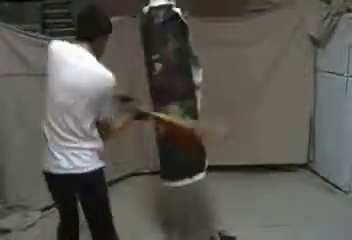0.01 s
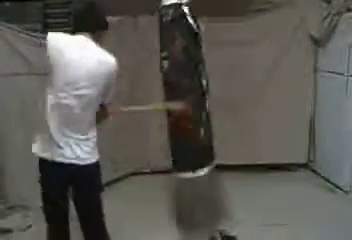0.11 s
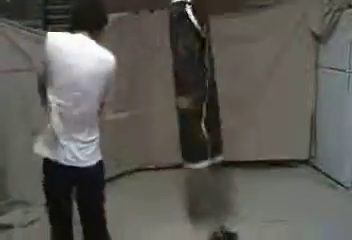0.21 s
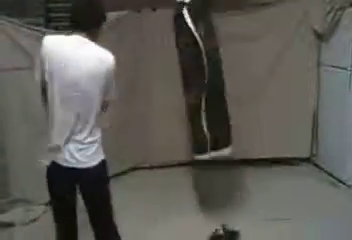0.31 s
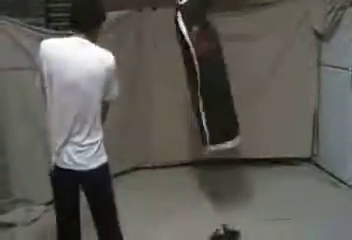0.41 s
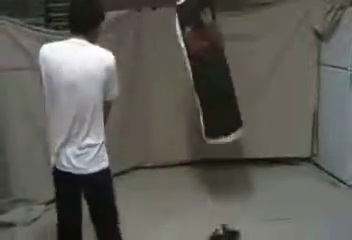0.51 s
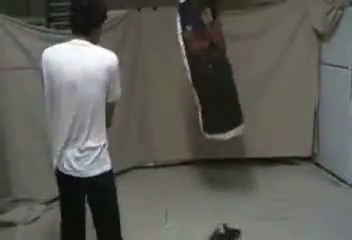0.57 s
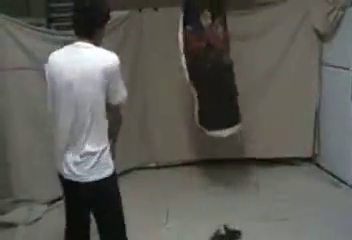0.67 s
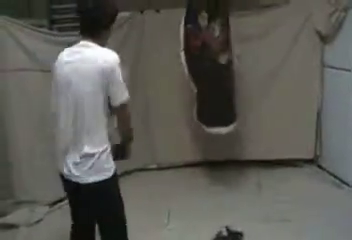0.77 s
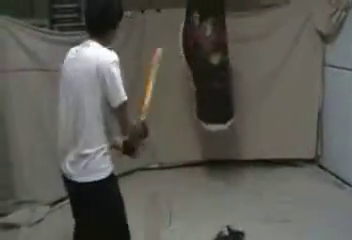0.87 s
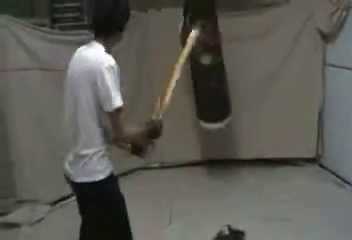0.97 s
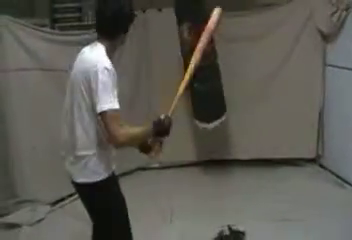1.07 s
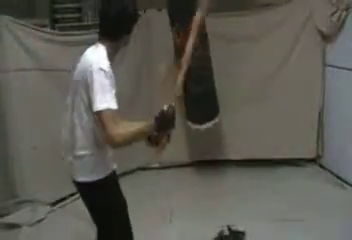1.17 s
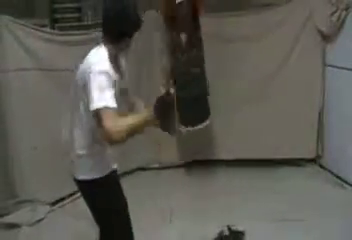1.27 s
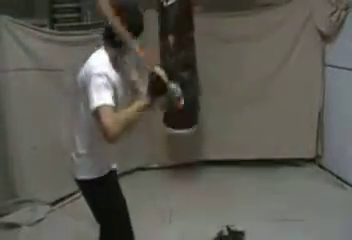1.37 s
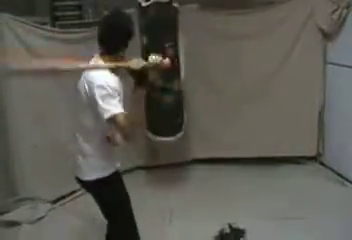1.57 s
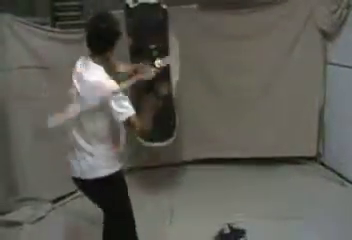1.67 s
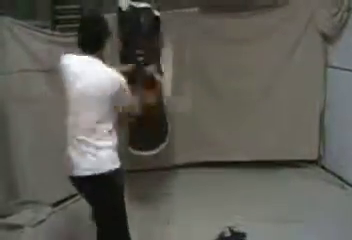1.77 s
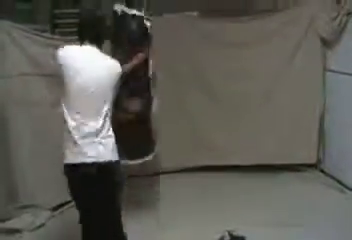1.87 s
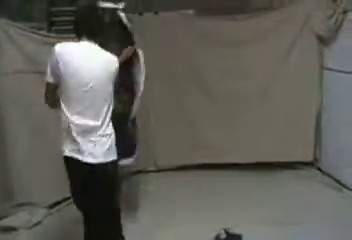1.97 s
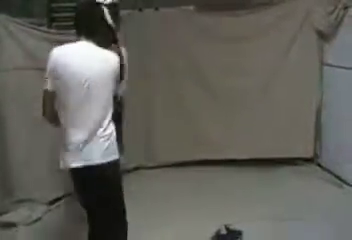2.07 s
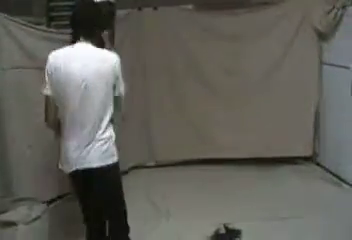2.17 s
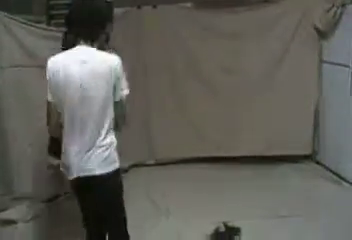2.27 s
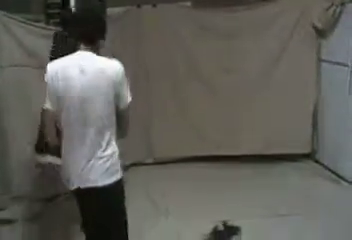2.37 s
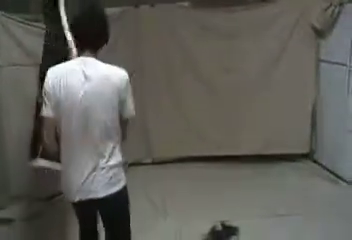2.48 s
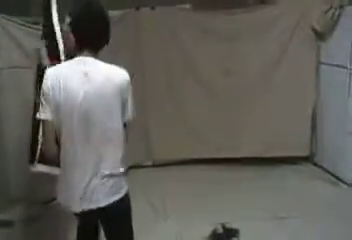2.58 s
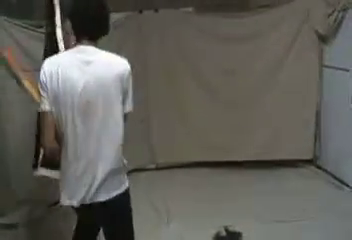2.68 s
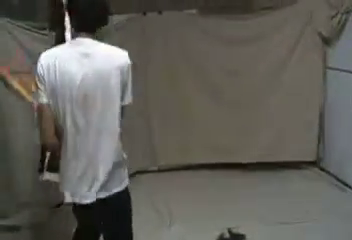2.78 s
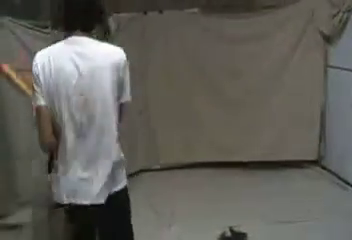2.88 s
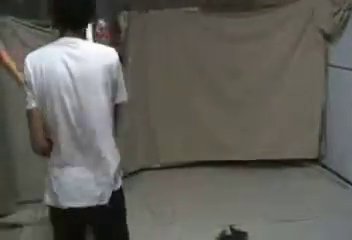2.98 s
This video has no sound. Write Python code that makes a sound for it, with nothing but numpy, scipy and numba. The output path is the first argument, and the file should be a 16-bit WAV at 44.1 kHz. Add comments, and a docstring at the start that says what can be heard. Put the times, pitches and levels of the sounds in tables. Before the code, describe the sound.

A wooden bat whacks a heavy bag twice in a booming, humming room.

```python
"""In a bare, booming room with a steady low hum, a wooden bat whacks a hanging heavy bag twice.
Each blow is a slap on the cover and a thud of the filling, and the room rings after it.
Around the swings, clothes tick and swish, shoes scuff and the bag's hanger rubs faintly.
Each blow overloads the microphone for a moment; a limiter turns the sound down and slowly back up."""
import sys
import numpy as np
from scipy import signal
from scipy.fft import rfft, irfft
from scipy.io import wavfile
from numba import njit

SR = 44100
rng = np.random.default_rng(int(sys.argv[2]) if len(sys.argv) > 2 else 0)


def master(y):
    """Save y as 16-bit WAV."""
    cut = np.clip(np.atleast_2d(y).T, -1, 1)
    pcm = np.round(cut * 32767)  # scale
    wavfile.write(sys.argv[1], SR, pcm.astype(np.int16))


N = 132300
TIME = np.arange(N) / SR
FREQS = np.maximum(np.arange(N // 2 + 1) * SR / N, 1)

# How much left and right differ. Each row: frequency in Hz, their difference against their sum in dB.
STEREO_WIDTH = [(60, -22.5), (190, -23), (340, -13.5), (590, -12.5), (1060, -10.5), (1900, -7), (3300, -4),
                (5900, 1), (10500, -2.5)]
# A motor's hum. Each row: pitch in Hz, level in dB.
MOTOR_TONES = [(56.8, -43), (113.9, -35), (227.5, -56.5), (392, -58), (600, -63.5)]
# The room's rumble and hiss. Each row: frequency in Hz, level in dB per octave.
RUMBLE_COLOUR = [(20, -19), (35, -58.5), (60, -39), (100, -43.5), (170, -49.5), (350, -52), (700, -56),
                 (1500, -53.5), (3000, -56), (6000, -60), (10500, -59)]
# The hanger's rubbing tones. Each row: pitch in Hz, width in Hz, level in dB.
HANGER_TONES = [(1250, 62, -49), (1410, 64, -51), (1590, 96, -44)]
# Faint ticks of clothing. Each row: start in seconds, level in dB, pitch in Hz.
CLOTH_TICKS = [(0.101, -40, 4000), (0.1779, -31, 1610)]
# Scuffs of shoes and cloth. Each row: peak time, rise and fall in seconds, level in dB,
# extra brightness in dB per octave.
SCUFF_EVENTS = [(.145, 0.019, 0.11, -48.5, 3), (1.006, 0.023, 0.073, -44.5, -1),
                (1.9, 0.034, 0.23, -53.5, 0), (1.947, .01, 0.014, -50, 6), (2.659, 0.01, 0.019, -35, 0),
                (2.67, 0.045, 0.09, -42, -1.5)]
# The tone of a scuff. Each row: frequency in Hz, level in dB per octave.
SCUFF_COLOUR = [(150, -14), (450, -5), (800, -5.5), (1500, -1), (2600, 0), (4800, 1), (7000, -3.5),
                (10500, -2)]
# Swishes of bat and body. Each row: peak time, rise and fall in seconds, level in dB.
SWISH_EVENTS = [(0.207, 0.015, 0.05, -43), (2.04, 0.028, 0.011, -48), (2.63, 0.12, .045, -39.5)]
# The dull tone of a swish. Each row: frequency in Hz, level in dB per octave.
SWISH_COLOUR = [(100, -23.5), (250, -6), (450, 3), (800, 1.5), (1400, -0.5), (2500, -6), (5000, -17.5),
                (10000, -34)]
# The room's ringing. Each row: frequency in Hz, level in dB per octave, seconds to build up,
# seconds to fade by 60 dB.
ROOM_BANDS = [(29, -11, 0.21, 1.39), (66.5, 3.5, 0.075, 1.024), (132, -2, 0.012, 0.55),
              (250, -7, 0.006, 0.61), (560, -13.5, 0.0068, 0.71), (1250, -11, 0.011, 0.73),
              (2510, -9, 0.025, 0.84), (4420, -14.5, 0.01, 0.85), (6130, -19, 0.0047, 0.84),
              (10800, -18, 0.0041, 0.59)]
# Echoes from the far wall. Each row: frequency in Hz, level in dB per octave.
WALL_COLOUR = [(60, -21), (160, -5.5), (350, -11.5), (700, -18), (2200, -12), (4500, -16.5), (10000, -21.5)]
# Tones that bat and cover favour. Each row: pitch in Hz, width in Hz, boost in dB.
BAT_AND_COVER_TONES = [(172.5, 11, 3), (1090, 100, 0), (1424, 88, 1), (1606, 240, 1.5), (2170, 120, 4),
                       (2430, 180, 3.5), (2690, 140, 0), (3510, 270, 4), (4150, 380, 3), (5000, 180, 2.5)]
# The slap on the cover. Each row: frequency in Hz, level in dB per octave.
SLAP_COLOUR = [(100, -9), (300, -4), (600, -12.5), (1200, -11), (2300, -4.5), (4500, -17), (7000, -17.5),
               (10500, -9.5)]
# The blows. Each row: time in seconds; slap, thud, room and extra room bass in dB; how many times as
# long the bass rings; wall echo in dB; the struck spot's pitch in Hz and its boost in dB.
BAT_BLOWS = [(0.2259, 14.5, 6, 0, 2.5, 1, -6.5, 1420, 4), (2.0435, 14, 19, 1.5, 2, 0.94, -1.5, 290, 2.5)]


def undb(db):
    """Turn decibels into a number to multiply by."""
    return 10 ** (np.asarray(db) / 20)


def curve(points):
    """Join (Hz, value) points with straight lines, giving every octave equal room."""
    hz, value = np.array(points, float).T
    return np.interp(np.log(FREQS), np.log(hz), value)


def hump(hz, octaves):
    """A bell shape over frequency, 1 at its centre."""
    return np.exp(-.5 * (np.log2(FREQS / hz) / octaves) ** 2)


def resonance(hz, width):
    """The peak around a pitch at which something likes to ring."""
    return 1 / (1 + (2 * (FREQS - hz) / width) ** 2)


def noise(db, width_db=0):
    """The spectrum of a stereo noise with the given level per octave; irfft turns it into sound."""
    mid, side = rfft(rng.standard_normal((2, N)))
    side = side * undb(curve(STEREO_WIDTH) + width_db)
    pink = np.sqrt(SR / 2 / np.log(2) / FREQS) / np.sqrt(1 + (20 / FREQS) ** 6)
    return np.array([mid + side, mid - side]) * pink * undb(db)


def swell(at, rise, fall):
    """A smooth rise to a peak, then a fade."""
    t = TIME - at
    return np.exp(-.5 * (np.minimum(t, 0) / rise) ** 2 - np.maximum(t, 0) / fall)


def background():
    """A motor hums steadily over low rumble and hiss."""
    hum = sum(undb(db) * np.sin(2 * np.pi * (hz * TIME + rng.random())) for hz, db in MOTOR_TONES)
    return np.sqrt(2) * hum + irfft(noise(curve(RUMBLE_COLOUR)), N)


def hanger():
    """The bag's hanger rubs faintly as it swings."""
    tones = sum(undb(db) * resonance(hz, width) for hz, width, db in HANGER_TONES)
    return swell(at=1.31, rise=0.13, fall=0.19) * irfft(noise(0) * tones, N)


def cloth_ticks():
    """Clothing ticks faintly just before the first blow."""
    out = 0
    for at, db, hz in CLOTH_TICKS:
        out += swell(at, rise=1 / SR, fall=0.0015) * irfft(noise(db) * hump(hz, octaves=1.1), N)
    return out


def scuffs():
    """Shoes and cloth rub, making short, grainy hisses."""
    out, grains_per_s, grain_db = 0, 402, 1.5
    for at, rise, fall, db, tilt_db in SCUFF_EVENTS:
        flicker = np.interp(TIME * grains_per_s, np.arange(N), rng.standard_normal(N))
        rub = irfft(noise(curve(SCUFF_COLOUR) + tilt_db * np.log2(FREQS / 4000)), N)
        out += undb(db + grain_db * flicker) * swell(at, rise, fall) * rub
    return out


def swishes():
    """The swinging bat and the turning body stir the air."""
    air = irfft(noise(curve(SWISH_COLOUR)), N)
    return air * sum(undb(db) * swell(at, rise, fall) for at, rise, fall, db in SWISH_EVENTS)


def wall_echo(at, colour_db):
    """The far wall throws a blow back as a blur of echoes."""
    delay_s, spread_s = 0.11, 0.031
    loudness = swell(at + delay_s, spread_s, spread_s) * (TIME > at)
    return loudness * irfft(noise(curve(WALL_COLOUR) + colour_db), N)


def room_boom(at, bass_db, bass_stretch, colour_db):
    """Sound builds up in the room and dies away, the bass last."""
    age = np.maximum(TIME - at, 0)
    spectrum = noise(curve([row[:2] for row in ROOM_BANDS]) + colour_db)
    out = 0
    for hz, _, build_s, fade_s in ROOM_BANDS:
        this_band_only = curve([(row[0], row[0] == hz) for row in ROOM_BANDS])
        band = irfft(spectrum * this_band_only, N)
        if hz < 100:
            band, fade_s = band * undb(bass_db), fade_s * bass_stretch
        out += band * (1 - np.exp(-age / build_s)) * undb(-60 * age / fade_s)
    return out


def impact(at, slap_db, thud_db, colour_db):
    """The bat pushes air ahead of it and slaps the cover, and the filling thuds."""
    t = TIME - at
    age = np.maximum(t, 0)
    push_hz, push_s, push_db = 71, 0.017, -13.5
    push = -np.sin(2 * np.pi * push_hz * t) * np.exp(-np.abs(t) / push_s)
    attack_s, hold_s, decay_s = 0.00021, 0.0039, 0.0011
    contact = np.minimum(age / attack_s, 1) * np.exp(-np.maximum(age - hold_s, 0) / decay_s)
    slap = contact * irfft(noise(curve(SLAP_COLOUR) + colour_db, width_db=-7), N)
    thud_hz, rise_s, fall_s = 112.5, 0.0021, 0.0081
    thud = -np.sin(2 * np.pi * thud_hz * age) * (1 - np.exp(-age / rise_s)) * np.exp(-age / fall_s)
    return undb(push_db) * push + undb(slap_db) * slap + undb(thud_db) * thud


def blows():
    """The bat hits the bag, each spot with its own tone, and the room answers."""
    out = 0
    shared_db = sum(db * resonance(hz, width) for hz, width, db in BAT_AND_COVER_TONES)
    for at, slap_db, thud_db, room_db, bass_db, bass_stretch, wall_db, spot_hz, spot_db in BAT_BLOWS:
        colour_db = shared_db + spot_db * hump(spot_hz, octaves=0.3)
        hit = impact(at, slap_db, thud_db, colour_db)
        boom = room_boom(at, bass_db, bass_stretch, colour_db)
        echo = undb(wall_db) * wall_echo(at, colour_db)
        out += hit + undb(room_db) * (boom + echo)
    return out


def scene():
    """All the sounds together, a little louder on the left."""
    left_right_db = [[0.55], [-0.55]]
    mix = blows() + scuffs() + swishes() + hanger() + cloth_ticks() + background()
    return mix * undb(left_right_db)


@njit
def limiter_cut(over_db, attack_s, release_db_per_s):
    """How many dB to turn down: the cut grows fast when the sound is too loud, then eases steadily."""
    out, cut_db = np.empty(len(over_db)), 0.
    for i in range(len(over_db)):
        if over_db[i] > cut_db:
            cut_db += (over_db[i] - cut_db) / (attack_s * SR)
        else:
            cut_db = max(cut_db - release_db_per_s / SR, 0.)
        out[i] = cut_db
    return out


def record(dry):
    """The microphone loses the highest treble; its limiter acts late, so each blow's start clips."""
    mic_top_hz, limit_db, fizz_db, top_hz = 11050, -4.5, -15.5, 15800
    mic_range = 1 / np.sqrt(1 + (FREQS / mic_top_hz) ** 200)
    heard = irfft(rfft(dry) * mic_range, N)
    over_db = 20 * np.log10(np.abs(heard).max(axis=0) + 1e-9) - limit_db
    cut_db = limiter_cut(over_db, attack_s=0.0045, release_db_per_s=43.5)
    clipped = np.clip(heard * undb(-cut_db), -1, 1)
    # Clipping adds fizz above the microphone's range: soften it, then cut off the very top.
    softened = irfft(rfft(clipped) * undb(fizz_db * (1 - mic_range)), N)
    return signal.sosfilt(signal.ellip(8, .2, 70, top_hz, fs=SR, output="sos"), softened)


dry = scene()
out = record(dry)
master(out)
```